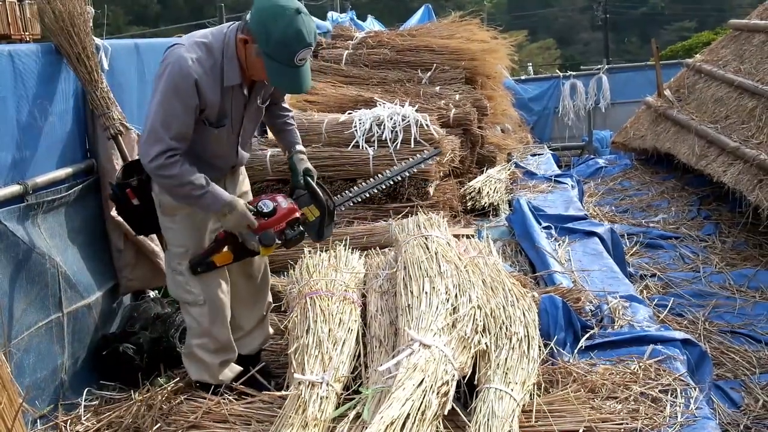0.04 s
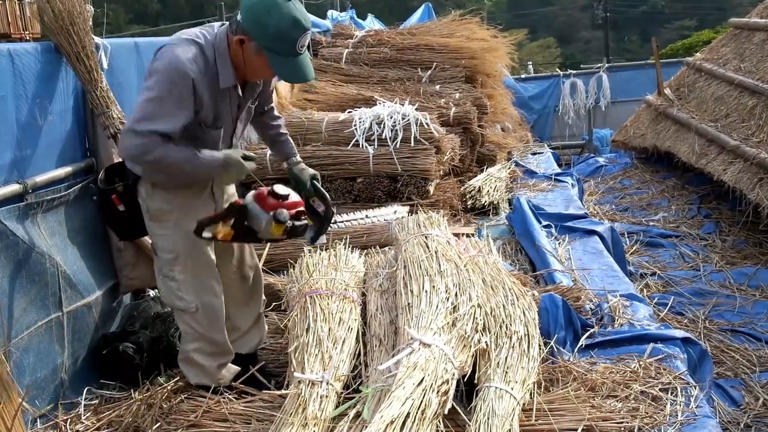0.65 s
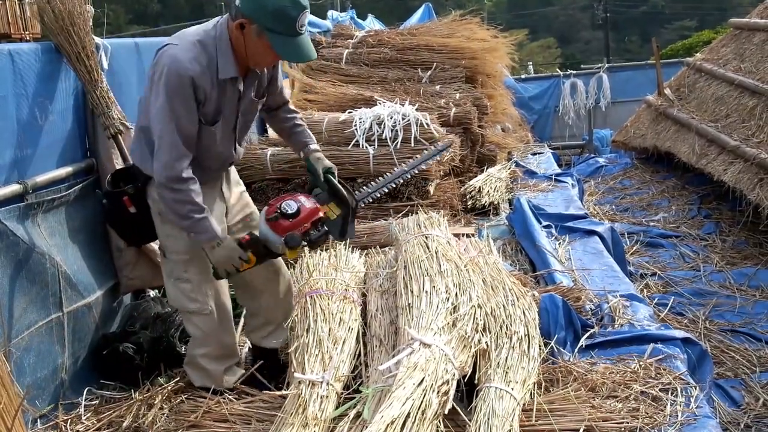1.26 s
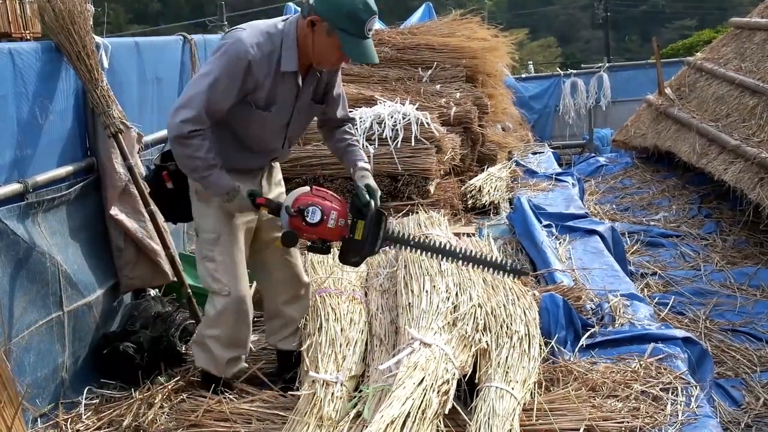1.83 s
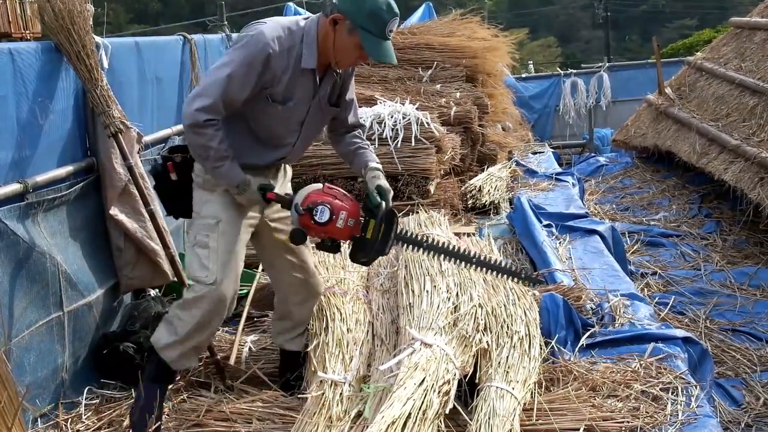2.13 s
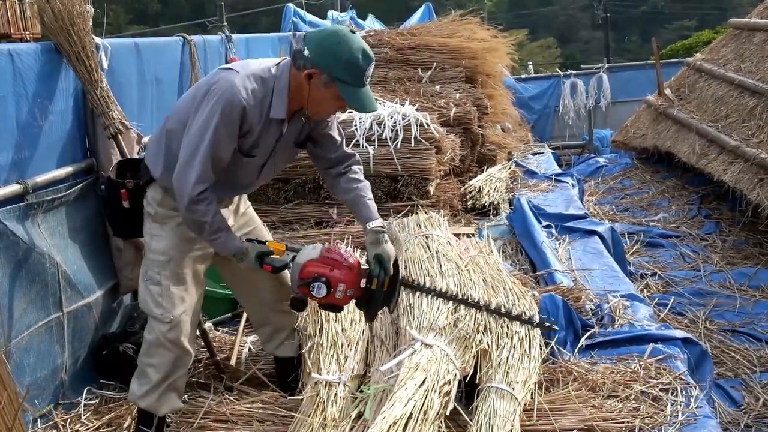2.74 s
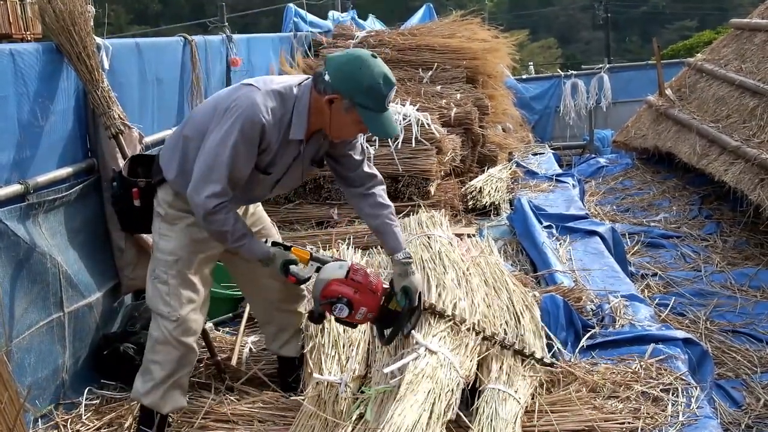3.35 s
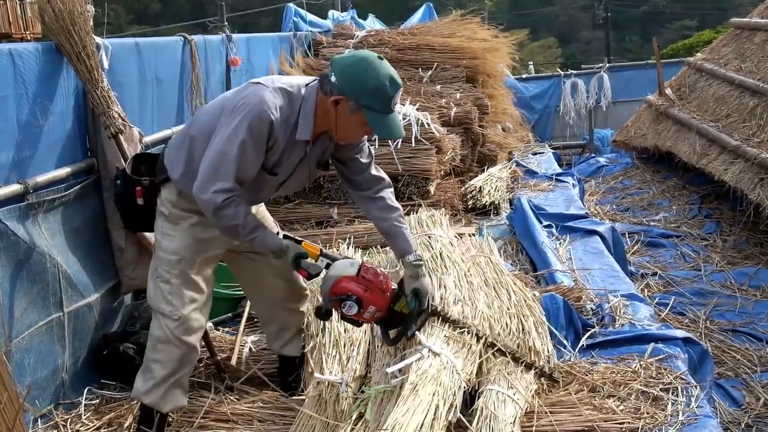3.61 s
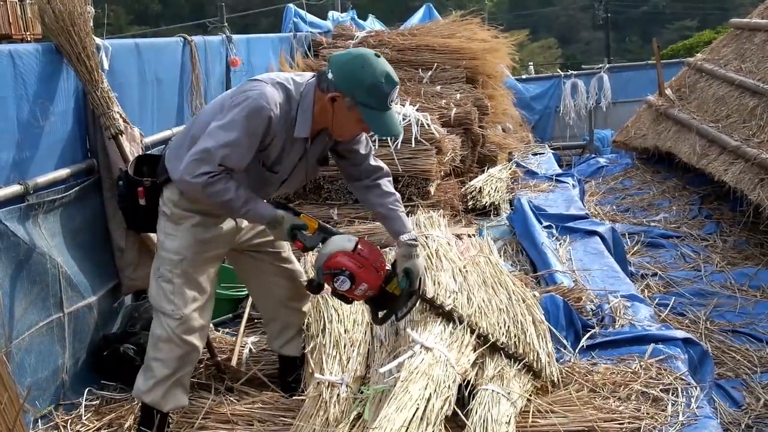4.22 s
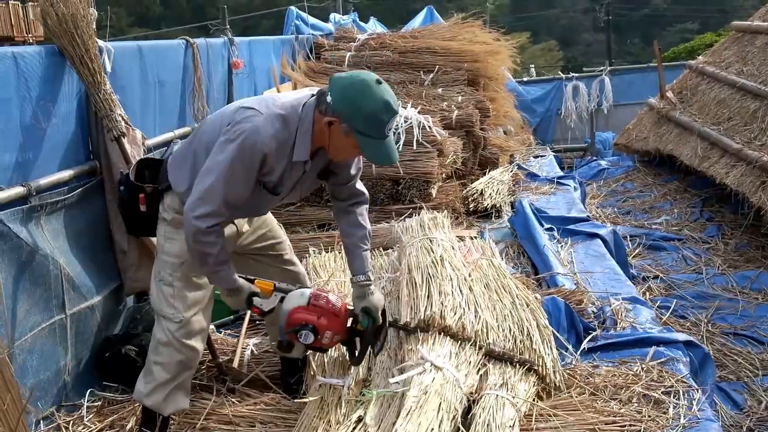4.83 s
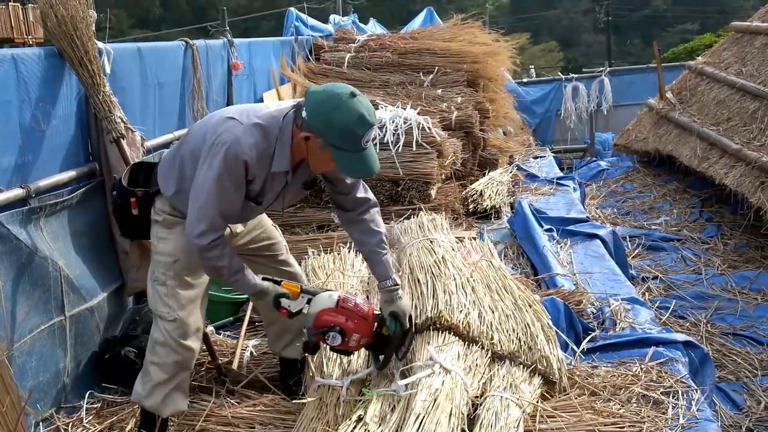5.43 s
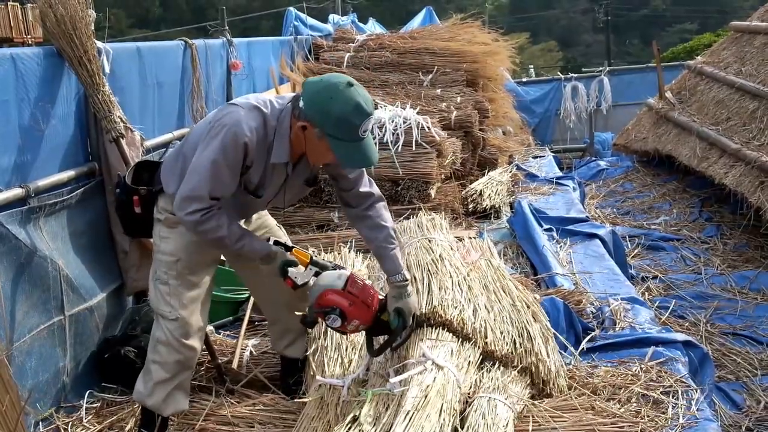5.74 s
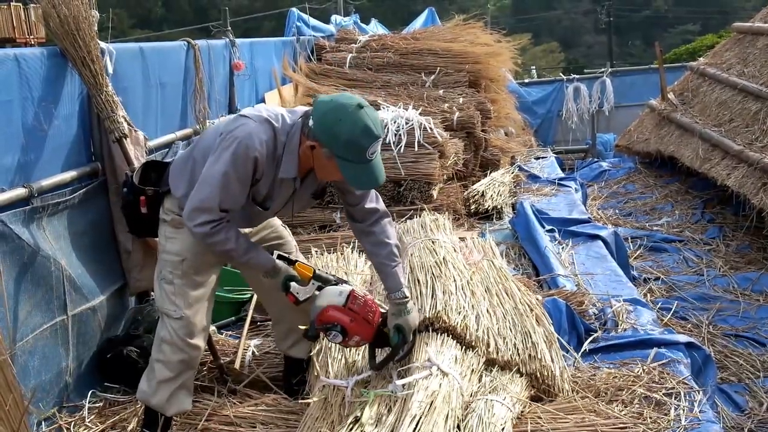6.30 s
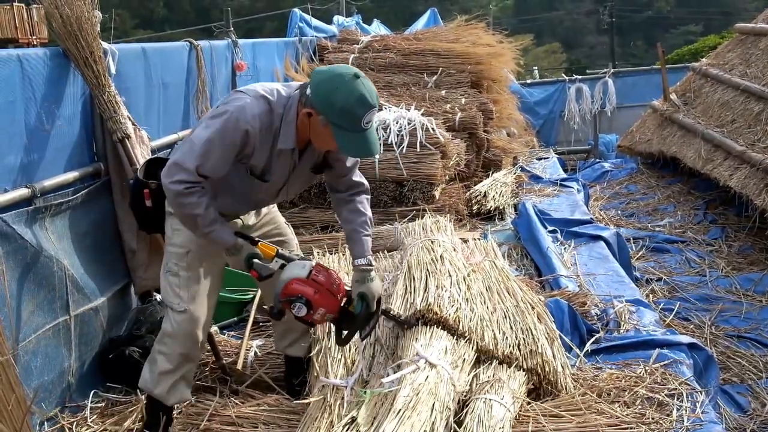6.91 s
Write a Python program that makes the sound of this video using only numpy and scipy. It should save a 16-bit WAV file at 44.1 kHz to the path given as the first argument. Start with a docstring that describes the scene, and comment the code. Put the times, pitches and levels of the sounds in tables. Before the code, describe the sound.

Outdoors, a few steps from the microphone, a small two-stroke engine catches over a soft distant hum. The starter handle clacks back and the engine idles with irregular pops. The throttle opens and the hedge trimmer rises to a loud, high buzz, its blades clattering and rasping. It keeps running as dry stalks snap lightly beneath the noise, the revs dipping and climbing with each cut.

```python
"""A faraway machine hums in the open air; then a two-stroke hedge trimmer is pull-started, putters at
idle, revs up and bites into bundles of straw. Crank speed drives the trimmer: each turn puffs through
the muffler, at idle only every second or third turn fires, and at speed the puffs merge into a drone
whose harmonics slide through the muffler's resonance. As the revs climb, the centrifugal clutch sets
the blades rattling, and dry stalks snap between their teeth."""
import sys
import numpy as np
from scipy import signal
from scipy.fft import rfft, irfft
from scipy.io import wavfile

SR = 44100
rng = np.random.default_rng(int(sys.argv[2]) if len(sys.argv) > 2 else 0)


def to_wav(sig):
    """Store sig (one row per channel, or 1-D mono) as 16-bit WAV at the path in sys.argv[1].

    Samples outside -1..1 are clipped; the rate is SR.
    """
    pcm = np.clip(np.atleast_2d(sig), -1, 1) * 32767
    pcm = np.round(pcm).astype(np.int16)
    wavfile.write(sys.argv[1], SR, pcm.T)  # frames by channels


N = 315756
TIME = np.arange(N) / SR
BINS = np.fft.rfftfreq(4096, 1 / SR)

# hum of the faraway machine: (frequency [Hz], relative level [dB])
FAR_HUM = [(86.1, -74), (177.6, -56), (263.8, -54), (349.9, -56.5)]
# tone colours of the air and of each hit or rattle: (frequency [Hz], relative level [dB])
AIR_EQ = [(24, -75), (40, -47.5), (74, -20.5), (97, -15), (108, -18), (138, -30), (156, -5.5), (177, -10.5),
          (205, -9), (358, -1), (1400, -9.5), (4940, -38), (5590, -40.5), (7270, -74), (12300, -120)]
KNOCK_EQ = [(30, -41), (150, -38), (400, 3), (700, 7), (1500, 2), (2200, -1.5), (3000, -18), (5000, -36),
            (8000, -48), (15000, -63)]
CLICK_EQ = [(800, -9), (4000, 3), (6500, -15), (9000, -33), (15000, -36)]
CLATTER_EQ = [(40, -61), (110, -34), (200, -16), (350, -10), (520, 0.5), (700, 2), (880, 4.5), (1050, 5),
              (1350, -3), (2100, -5), (2500, -19), (3500, -17), (7000, -58.5)]
RASP_EQ = [(1000, -36), (2300, -5.5), (2900, -0.5), (3500, -3.5), (4000, -9.5), (5000, -12.5),
           (6000, -21.5), (6900, -27), (8200, -24.5), (10000, -37.5), (12500, -39.5), (15500, -60)]
PUFF_EQ = [(30, -55), (100, -28), (160, -24), (205, -9), (300, -3), (400, 5.5), (480, -1.5), (650, 0),
           (850, -15), (1100, -38), (1500, -39), (3000, -46), (8000, -61)]
BANG_EQ = [(100, -28), (300, -11), (650, 9), (1000, 3), (1700, -13.5), (3000, -22), (6000, -33),
           (14000, -75)]
SLAP_EQ = [(500, -11), (1600, 13.5), (3200, 1.5), (3900, 7), (4400, 4), (5000, -13), (5650, -3),
           (6500, -20), (7200, -12), (7900, -1.5), (8500, -13), (9800, -20), (15000, -36)]
# the engine catches, idles and opens up: (time [s], crank speed [turns/s])
IDLE_REVS = [(0.68, 16.4), (0.76, 29.5), (0.87, 42.5), (1.05, 50.7), (1.38, 51.5), (1.55, 55.1),
             (1.83, 55.7), (1.95, 61.0), (2.17, 61.6), (2.26, 75.8), (2.43, 78.1)]
# it sags under each cut and recovers: (time [s], crank speed [turns/s])
CUTTING_REVS = [(2.5, 84.8), (2.91, 120.8), (3.07, 129.2), (3.15, 131.1), (3.26, 129.1), (3.63, 115.2),
                (4.2, 147.1), (4.41, 154.1), (4.59, 147.7), (4.74, 135.6), (5.13, 136.1), (5.34, 152.2),
                (5.48, 160.1), (5.71, 143.3), (5.98, 146.4), (6.15, 137.2), (6.45, 136.9), (6.83, 154.7),
                (7.03, 154.9), (7.16, 149.6)]
# the starter grip hits the housing: (time [s], level [dB], brightness [dB])
GRIP_KNOCKS = [(1.009, -12.5, 8), (1.018, -13, -21), (1.0254, -8.5, -17), (1.033, -14, -13),
               (1.092, -19, -12), (1.111, -18.5, -15), (1.117, -22.5, -18)]
# ring of the casing: (frequency [Hz], width [Hz], boost [dB])
CASING_MODES = [(1000, 110, 2.5), (1639, 76, 7.5), (2190, 140, 3.5), (2670, 510, 3.5), (5630, 200, -2)]
# ring of the cylinder and its cover: (frequency [Hz], half-width [Hz], level at idle [dB])
CYLINDER_MODES = [(1659, 52, -49), (4050, 45, -63), (4450, 51, -63), (5560, 60, -69), (7700, 160, -75.5)]
# ring of the blade bar: (frequency [Hz], half-width [Hz], level free [dB], level in the straw [dB])
BLADE_MODES = [(1679, 45, -29, -29.5), (2870, 99, -30.5, -38), (4170, 70, -46.5, -52), (4350, 44, -59, -45),
               (7980, 130, -58.5, -68.5), (8750, 260, -64, -63)]
# exhaust puffs at low revs: (time [s], relative level [dB], pitch [ratio])
PUFF_CONTOUR = [(0.7, -37, 1.08), (0.85, -31.5, 0.99), (1.2, -28.5, 1.04), (1.45, -29.5, 0.974),
                (1.7, -32, 0.927), (2.3, -30, 0.97)]
# runs of firings: (start [s], firings [count], spacing [turns], relative slap [dB], relative bang [dB])
FIRINGS = [(0.7477, 6, 2, -39, -31), (1.2703, 3, 3, -36.5, -31), (1.5369, 8, 3, -35, -22.5),
           (1.9625, 2, 3, -26, -22), (2.0448, 1, 2, -25, -23), (2.205, 10, 2, -29, -25),
           (2.4674, 2, 2, -29, -16), (2.583, 1, 2, -32, -16.5), (2.6324, 3, 2, -42, -18.5)]
# tone of the drone's whole and half crank orders: (frequency [Hz], relative level [dB])
WHOLE_ORDER_EQ = [(60, -15), (115, -24), (150, -11), (235, -7), (290, 2), (400, -5.5), (470, 1), (550, -9),
                  (610, 0), (690, -4.5), (1000, -0.5), (1130, -6), (1260, -7), (1400, -13), (1660, -11),
                  (1900, -12), (3000, -23)]
HALF_ORDER_EQ = [(80, -51.5), (170, -21), (215, -10.5), (350, -18.5), (470, 4), (560, -7), (690, 1),
                 (750, -0.5), (850, -33), (1000, 1.5), (1400, -23.5), (1680, -12.5), (2000, -13.5),
                 (3000, -28.5)]
# extra bite on the whole orders while the engine pulls up to speed: (frequency [Hz], boost [dB])
PULLING_EQ = [(150, -2.5), (310, -5), (480, -7), (630, 9), (900, 5), (1200, -6)]
# level ride on the upper whole orders: (time [s], boost [dB])
OVERTONE_RIDE = [(2.6, 1), (3.0, 7.5), (3.35, 1), (4.1, 2.5), (4.5, 1.5), (5.1, -1.5), (5.47, 5),
                 (5.85, 2.5), (7.16, 1)]
# the muffler's resonance as the trimmer is lowered onto the straw: (time [s], relative level [dB])
MUFFLER_RIDE = [(2.3, -30), (2.6, -29), (2.85, -19), (3.02, -24), (3.3, -20), (3.8, -15), (4.4, -13.5),
                (5.45, -11.5), (5.85, -15), (6.3, -12), (7.16, -11.5)]
# stereo balance: (frequency [Hz], left minus right [dB])
STEREO_TILT = [(60, -9), (98, 5), (160, 2.5), (260, 2), (430, 1.0), (710, 0.5), (1170, 0.0), (1910, -1.5),
               (3130, -3.0), (5140, -3.5)]
# stereo phase: (frequency [Hz], lead of the left side [rad])
STEREO_LEAD = [(0, 0), (260, -0.27), (1810, -0.29), (3190, -0.024), (5340, 0.0)]

# crank speeds [turns/s]; a pair is the start and end of a fade
IDLE_SPEED, CLUTCH_BITES = 52, (54.8, 88)
PUFFS_FADE, DRONE_GROWS = (68, 122), (69.6, 113)


def amp(db):
    """Decibels to gain."""
    return 10 ** (np.asarray(db) / 20)


def unit(x):
    """Scales to rms 1."""
    return x / np.sqrt(np.mean(x ** 2) + 1e-20)


def eq(points, hz=BINS):
    """A spectrum, joined by straight lines over log frequency."""
    f, value = np.transpose(points)
    return np.interp(np.log(hz + 1), np.log(f + 1), value)


def curve(rows, t, column=1):
    """One column of a time table, read at time t."""
    rows = np.asarray(rows)
    return np.interp(t, rows[:, 0], rows[:, column])


def ramp(x, start, end):
    """Rises from 0 to 1 between two values."""
    return np.clip((x - start) / (end - start), 0, 1)


def add(mix, s, sound):
    """Mixes a sound in at time s."""
    part = mix[round(s * SR):][:len(sound)]
    part += sound[:len(part)]


def wander(rate_hz, size=N, step=1):
    """Smooth random drift of rms 1, rolled off above the rate."""
    hz = np.fft.rfftfreq(size, step / SR)
    return unit(irfft(rfft(rng.standard_normal(size)) / (1 + (hz / rate_hz) ** 4), size))


def colour(x, db):
    """Minimum-phase filter with the given shape at BINS and an impulse response of energy 1."""
    log_gain = np.log(amp(np.maximum(db, -100)))
    mirrored = np.r_[log_gain, log_gain[-2:0:-1]]
    taps = irfft(np.exp(np.conj(signal.hilbert(mirrored)))[:len(BINS)])
    return signal.oaconvolve(x, taps / np.linalg.norm(taps))[:len(x)]


def ringing(drive, hz, half_width):
    """The ring of one driven mode, at rms 1."""
    return unit(colour(drive, -20 * np.log10(1 + ((BINS - hz) / half_width) ** 2)))


def through_casing(x, tone):
    """Gives a rattle its tone colour plus the casing's resonances."""
    boost_db = sum(db / (1 + (2 * (BINS - hz) / width) ** 2) for hz, width, db in CASING_MODES)
    return colour(x, eq(tone) + boost_db)


def speed(t):
    """Crank turns per second, zero before the start."""
    return curve(IDLE_REVS + CUTTING_REVS, t) * (t >= IDLE_REVS[0][0])


def shaken(turns, steady, decay_turns, uneven_db, alternate_db):
    """Noise that bursts once a turn, alternately harder and softer, never twice alike."""
    count = turns.astype(int)
    burst_db = uneven_db * rng.standard_normal(count[-1] + 1)[count] + alternate_db * (count % 2)
    envelope = steady + amp(burst_db) * np.exp(-(turns % 1) / decay_turns)
    return unit(envelope * rng.standard_normal(N))


def far_machine(waver=0.0055, gain_db=-2):
    """A faraway machine hums, its pitch wavering slightly."""
    clock = np.cumsum(1 + waver * wander(3.2)) / SR
    return amp(gain_db) * np.sqrt(2) * sum(amp(db) * np.sin(2 * np.pi * hz * clock) for hz, db in FAR_HUM)


def outdoor_air(flutter=0.092, level_db=-44):
    """A soft, fluttering bed of outdoor noise."""
    wash = rng.standard_normal(N) * (1 + flutter * wander(30))
    return amp(level_db) * unit(colour(wash, eq(AIR_EQ)))


def rumble(level_db=-55, swell_db=2):
    """A faint, lumpy low end at high revs, partly different at each ear."""
    low_db = eq([(20, -7.5), (70, -1), (110, -3.0), (250, -30), (1000, -71.0)])
    shared, left, right = (unit(colour(rng.standard_normal(N), low_db)) for _ in range(3))
    envelope = amp(level_db + swell_db * wander(2)) * ramp(speed(TIME), 82, 140)
    return envelope * (shared + .5 * np.array([left, right]))


def reflections(x, t60=0.023, level_db=-22):
    """Faint, bright scatter from tarpaulins and straw, different at each ear."""
    t = np.arange(SR // 6) / SR
    taps = rng.standard_normal((2, len(t))) * (rng.random((2, len(t))) < 2000 / SR)
    taps *= amp(-60 * t / t60) * (t > .004)
    taps /= np.linalg.norm(taps, axis=1, keepdims=True)
    bright = signal.sosfilt(signal.butter(1, 900, "high", fs=SR, output="sos"), x)
    return amp(level_db) * signal.oaconvolve(bright[None], taps, axes=1)[:, :N]


def straw(snaps_per_s=250, level_db=-47, spread_db=4, fade_in_s=(2.7, 3.2)):
    """Dry stalks snap between the teeth once the blade is in the bundle."""
    hits = rng.random(N) < snaps_per_s / SR
    strength = amp(spread_db * np.minimum(rng.exponential(1, N), 4))
    snaps = hits * strength * rng.choice([-1, 1], N)
    crack_db = eq([(500, -14.0), (2000, -4.5), (4500, 14), (8000, -14.5), (15000, -33.5)])
    return amp(level_db) * unit(colour(snaps, crack_db)) * ramp(TIME, *fade_in_s)


def starter(decay_s=0.0086, click_s=0.00061, click_db=-10):
    """The cord snaps back and its plastic grip knocks on the housing, first with a hard click."""
    t, knocks, clicks = np.arange(SR // 16) / SR, np.zeros(N), np.zeros(N)
    for s, db, bright_db in GRIP_KNOCKS:
        add(knocks, s, amp(db) * np.exp(-t / decay_s) * rng.standard_normal(len(t)))
        click = np.exp(-t / click_s) * rng.standard_normal(len(t))
        add(clicks, s, amp(db + bright_db + click_db) * click)
    return colour(knocks, eq(KNOCK_EQ)) + colour(clicks, eq(CLICK_EQ))


def cylinder(turns, growth=1.6):
    """Piston knocks keep the engine's light metal ringing, harder as the idle picks up."""
    knocks = shaken(turns, steady=.1, decay_turns=.2, uneven_db=5.5, alternate_db=3)
    force = (np.minimum(speed(TIME), CLUTCH_BITES[1]) / IDLE_SPEED) ** growth
    return force * sum(amp(db) * ringing(knocks, hz, width) for hz, width, db in CYLINDER_MODES)


def blade_bar(turns, press_s=(3.7, 4.4)):
    """Once the clutch bites, strokes ring the steel bar; the straw damps some modes and scrapes others."""
    pressed, out = ramp(TIME, *press_s), np.zeros(N)
    for hz, width, free_db, pressed_db in BLADE_MODES:
        strokes = shaken(turns, steady=0.45, decay_turns=0.43, uneven_db=1.5, alternate_db=5.5)
        out += ringing(strokes, hz, width) * amp(free_db + (pressed_db - free_db) * pressed)
    return out * ramp(speed(TIME), CLUTCH_BITES[0], 102)


def rattle(turns, gear_clatter_db=-36, blade_clatter_db=-21.5, gear_rasp_db=-56, blade_rasp_db=-30):
    """Gears clatter and rasp with the engine; the sliding blades join in as the clutch grips."""
    revs = speed(TIME)
    gears = (revs / IDLE_SPEED) ** 0.36
    grip = ramp(revs, *CLUTCH_BITES)
    clatter = shaken(turns, steady=0.48, decay_turns=1, uneven_db=3, alternate_db=-1)
    clatter *= amp(gear_clatter_db) * gears + amp(blade_clatter_db - 0.14 * wander(6)) * grip
    rasp = shaken(turns, steady=1, decay_turns=1, uneven_db=1.5, alternate_db=4.5)
    rasp *= amp(gear_rasp_db) * gears + amp(blade_rasp_db) * grip * ramp(revs, 0, 115)
    return through_casing(clatter, CLATTER_EQ) + through_casing(rasp, RASP_EQ)


def firings(turns, bang_db=22, echo_db=-7, echo_s=0.00458, slap_db=-1, slap_s=0.0039, spread_db=1.2):
    """At low revs every second or third turn fires: a sharp bang that rattles piston and clutch."""
    t, bangs, slaps = np.arange(SR // 20) / SR, np.zeros(N), np.zeros(N)
    slap_envelope = (0.66 + t / slap_s) * np.exp(-t / slap_s)
    for first_s, count, every, bright_db, db in FIRINGS:
        firing_turns = turns[round(first_s * SR)] + every * np.arange(count)
        for s in np.interp(firing_turns, turns, TIME):
            force = amp(spread_db * rng.standard_normal())
            add(bangs, s, force * amp([db + bang_db]))
            add(bangs, s + echo_s, force * amp([db + bang_db + echo_db]))
            add(slaps, s, force * amp(bright_db + slap_db) * rng.standard_normal(len(t)) * slap_envelope)
    return colour(bangs, eq(BANG_EQ)) + through_casing(slaps, SLAP_EQ)


def puffs(turns, echo=0.63, echo_s=0.00443, tail_s=0.012, tail_db=-15, spread_db=.6, detune=.025):
    """One muffler puff a turn, each much like the next, with a close reflection and a diffuse tail."""
    starts = np.flatnonzero(np.diff(np.floor(turns))) / SR
    t, out = np.arange(SR // 20) / SR, np.zeros(N)
    shape = colour(1. * (t == 0), eq(PUFF_EQ))
    shape = (shape + echo * np.interp(t - echo_s, t, shape, left=0)) / np.hypot(1, echo)
    for s in starts[speed(starts) < PUFFS_FADE[1]]:
        size, stretch = rng.standard_normal(2)
        pitch = curve(PUFF_CONTOUR, s, column=2) + detune * stretch
        puff = np.interp(t * pitch, t, shape)
        scatter = rng.standard_normal(len(t)) * (t / tail_s) * np.exp(-t / tail_s)
        puff += amp(tail_db) * signal.fftconvolve(puff, scatter / np.linalg.norm(scatter))[:len(t)]
        gain = amp(curve(PUFF_CONTOUR, s) + spread_db * size) * np.sqrt(SR / speed(s))
        add(out, s, gain * (1 - ramp(speed(s), *PUFFS_FADE)) * puff)
    # the puffs are kept between 100 Hz and 4.5 kHz
    return signal.sosfilt(signal.butter(3, [100, 4500], "band", fs=SR, output="sos"), out)


def muffler(t, hz, is_half, cool_hz=708, hot_hz=784, width_hz=140, load_from_s=3.36, heating_s=0.7):
    """Each harmonic's level in the muffler's resonance, whose pitch rises as the exhaust gas heats up."""
    centre_hz = hot_hz + (cool_hz - hot_hz) * np.exp(-np.maximum(t - load_from_s, 0) / heating_s)
    ring = amp(-14 * is_half) / (1 + (2 * (hz - centre_hz) / width_hz) ** 2) ** 2
    # partly levelled: it still dips when the resonance falls between two harmonics
    return ring * amp(curve(MUFFLER_RIDE, t)) / (np.linalg.norm(ring, axis=0) + 1e-9) ** 0.68


def drone(turns, body_db=-28.5, flicker_db=2, swell_db=1, jitter_turns=0.0057, roughness=0.067):
    """The engine's full voice: crank harmonics, with half orders as strong and weak firings alternate."""
    t, orders = TIME[::128], np.arange(2, 45)[:, None] / 2
    hz, is_half = orders * speed(t), orders % 1 > 0
    flicker = np.array([wander(6, size=len(t), step=128) for _ in orders]) * np.minimum(hz / 500, 2)
    # pulling up to speed on a wide-open throttle, every turn fires hard and the mids stand out
    throttle = ramp(t, 2.38, 2.53) * (1 - ramp(t, 2.845, 2.92))
    boost_db = throttle * eq(PULLING_EQ, hz) + curve(OVERTONE_RIDE, t) * ramp(hz, 1130, 1300)
    tone_db = np.where(is_half, eq(HALF_ORDER_EQ, hz), eq(WHOLE_ORDER_EQ, hz) + boost_db)
    body = amp(body_db + tone_db + flicker_db * flicker)
    levels = np.sqrt(2) * np.hypot(body, muffler(t, hz, is_half)) * ramp(speed(t), *DRONE_GROWS)
    angle = 2 * np.pi * (turns + jitter_turns * wander(79))
    stack = sum(np.interp(TIME, t, level) * np.sin(order * angle + 2 * np.pi * rng.random())
                for order, level in zip(orders[:, 0], levels))
    return stack * (1 + roughness * wander(90)) * amp(swell_db * wander(1.84))


def scene():
    """The trimmer a few steps away, over the outdoor bed."""
    turns = np.cumsum(speed(TIME)) / SR + .6  # the crank rests partway through a turn
    engine = starter() + puffs(turns) + firings(turns) + drone(turns) + cylinder(turns)
    cutting = rattle(turns) + blade_bar(turns) + straw()
    mix = engine + cutting + far_machine() + outdoor_air()
    return mix + reflections(mix) + rumble()


def record(dry, ceiling=.88, cutoff_hz=15750):
    """Two close microphone ports differ in level and phase; peaks are rounded, the top end rolled off."""
    hz = np.fft.rfftfreq(N, 1 / SR)
    port = amp(eq(STEREO_TILT, hz) / 2) * np.exp(1j * eq(STEREO_LEAD, hz) / 2)
    pair = irfft(rfft(dry) * np.array([port, 1 / port]), N)
    rounded = pair / (1 + (pair / ceiling) ** 8) ** (1 / 8)
    lowpass = signal.firwin(511, cutoff_hz, window=("kaiser", 9), fs=SR)
    return signal.oaconvolve(rounded, lowpass[None], "same")


dry = scene()
out = record(dry)
to_wav(out)
```